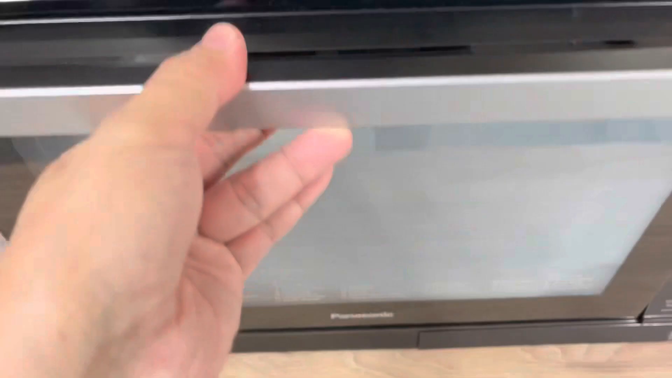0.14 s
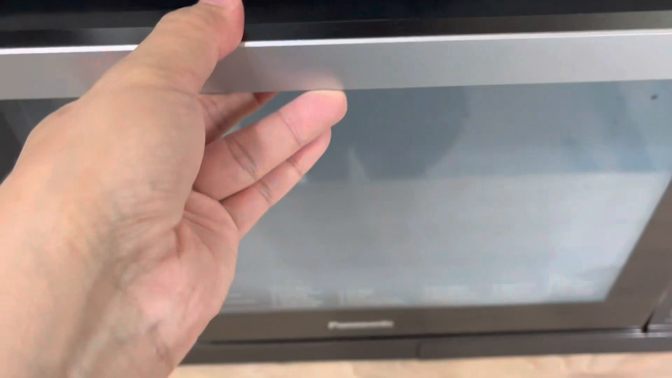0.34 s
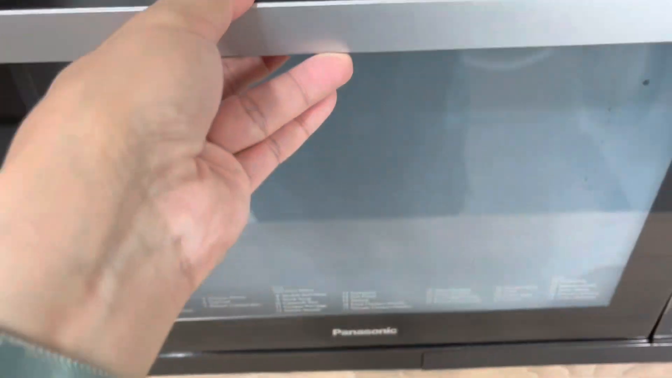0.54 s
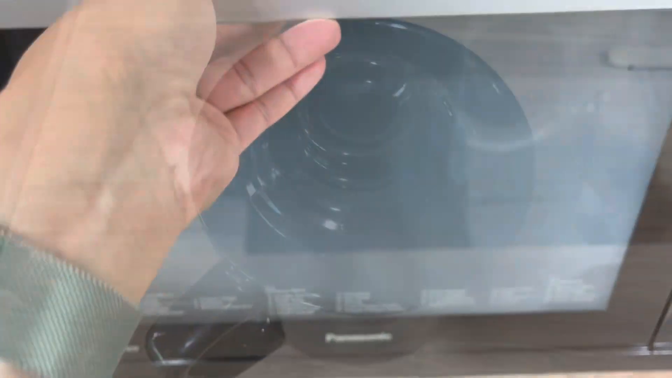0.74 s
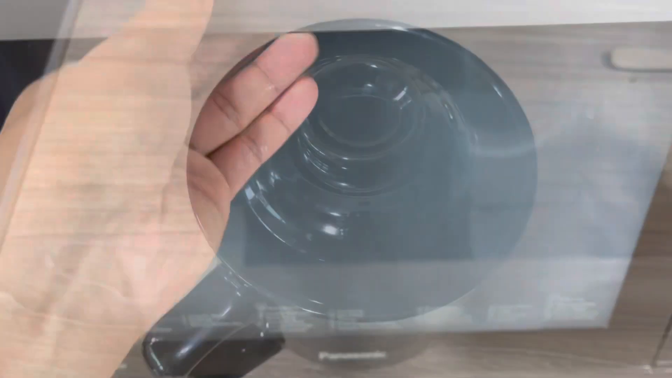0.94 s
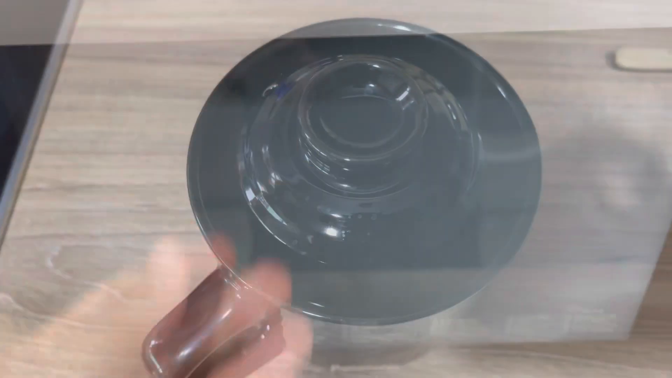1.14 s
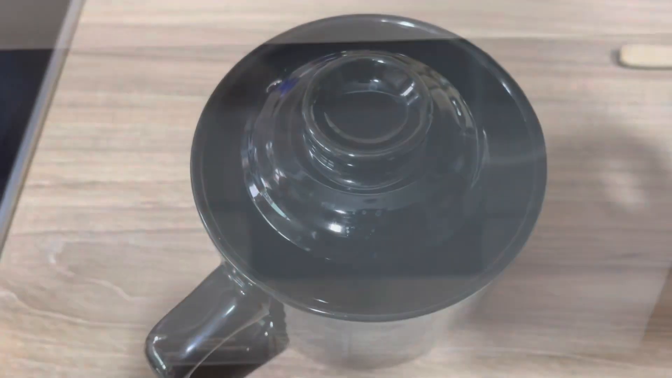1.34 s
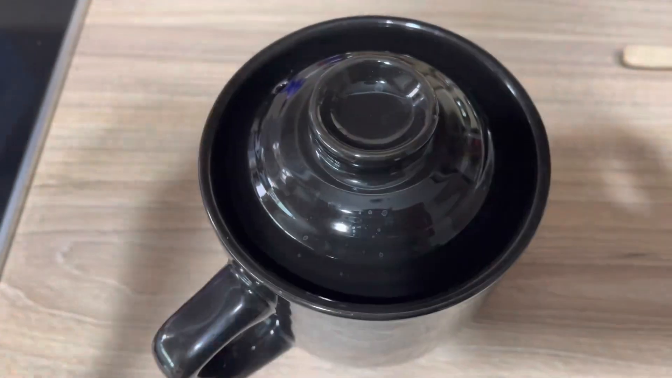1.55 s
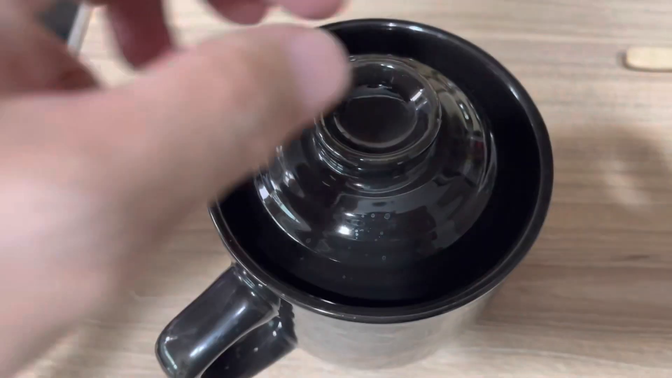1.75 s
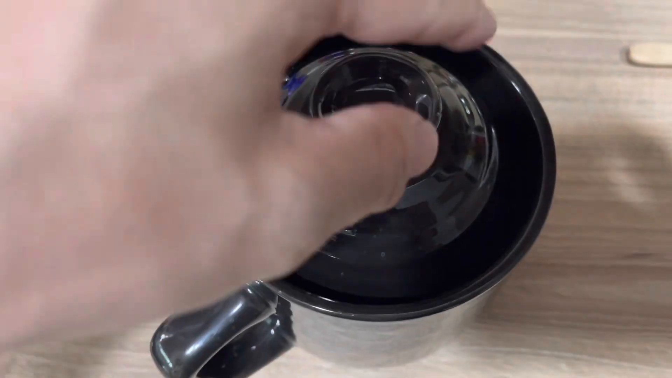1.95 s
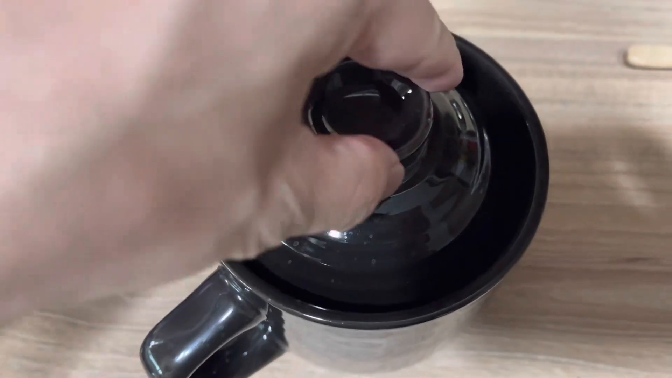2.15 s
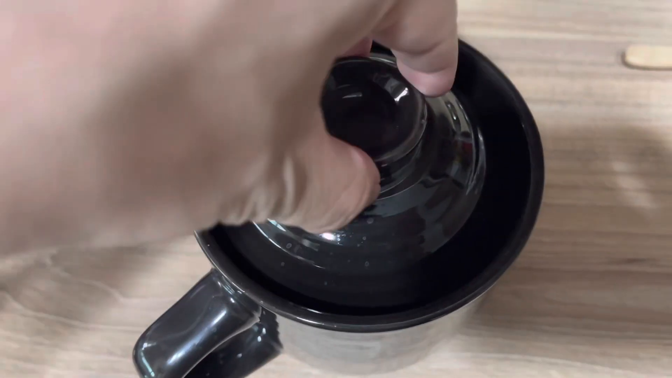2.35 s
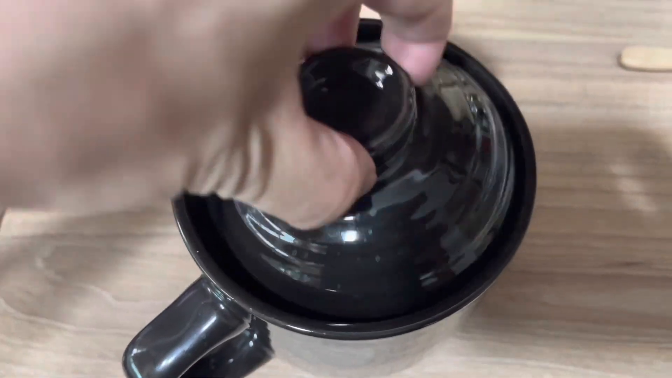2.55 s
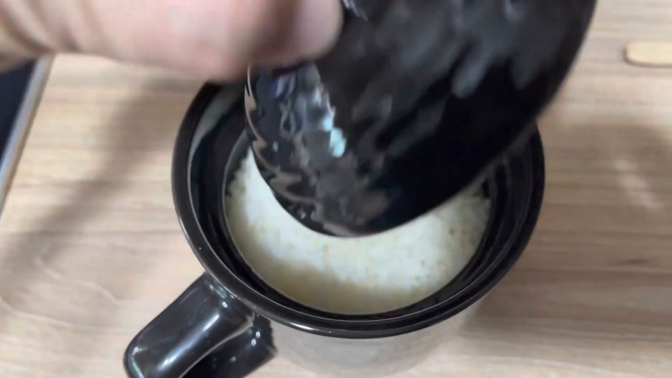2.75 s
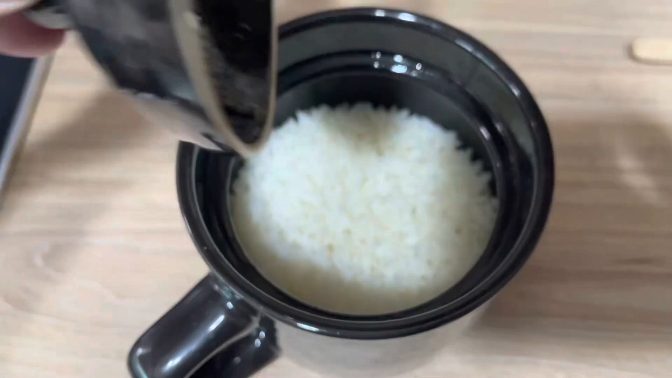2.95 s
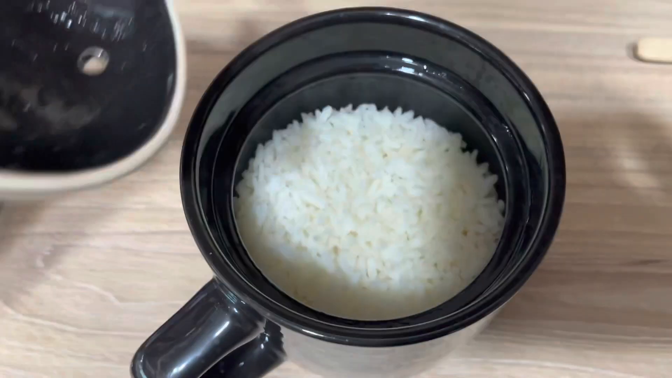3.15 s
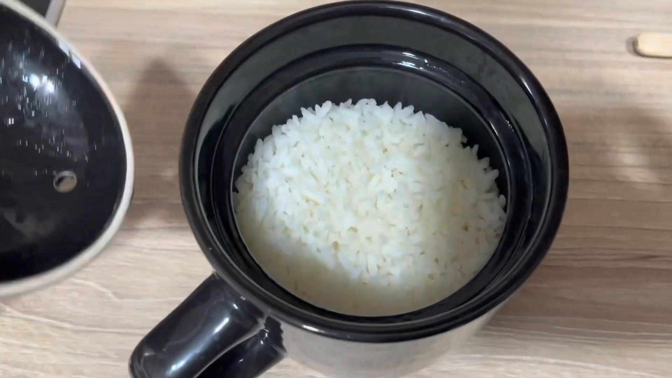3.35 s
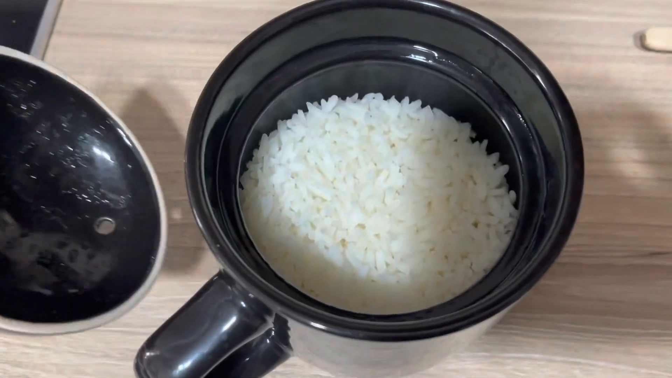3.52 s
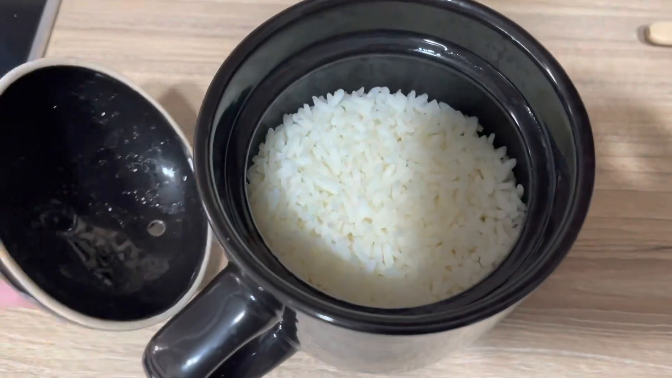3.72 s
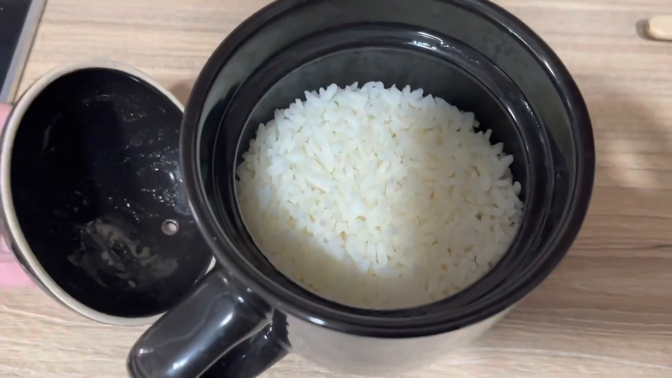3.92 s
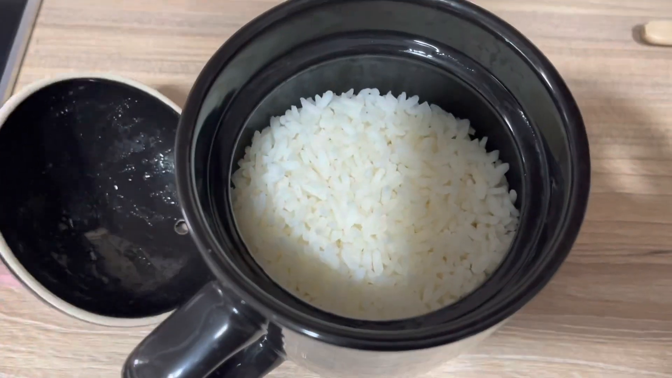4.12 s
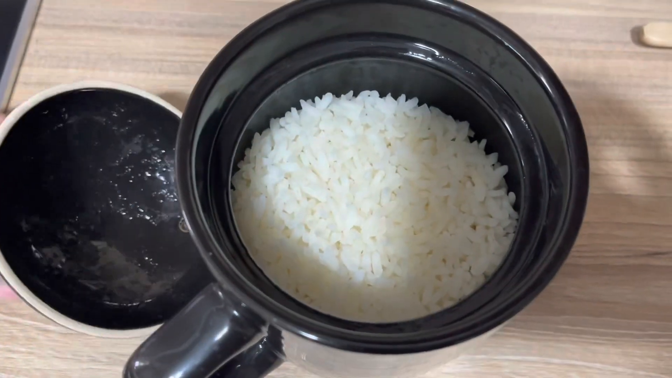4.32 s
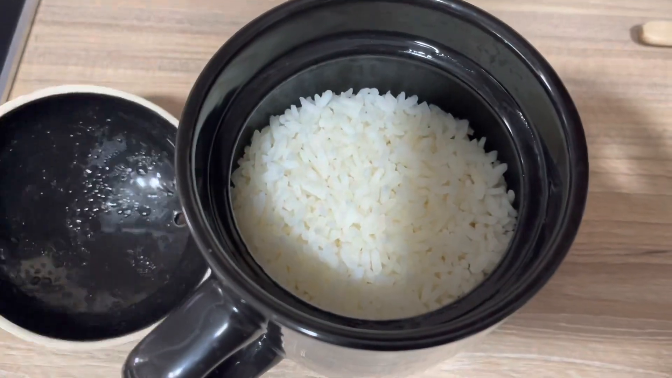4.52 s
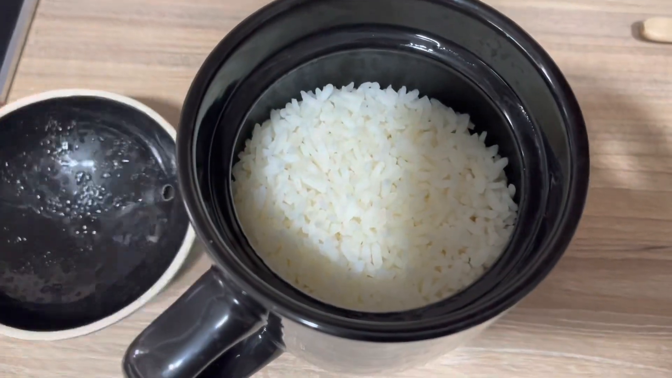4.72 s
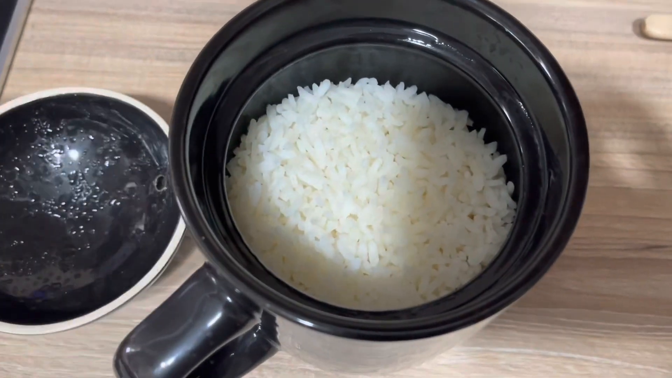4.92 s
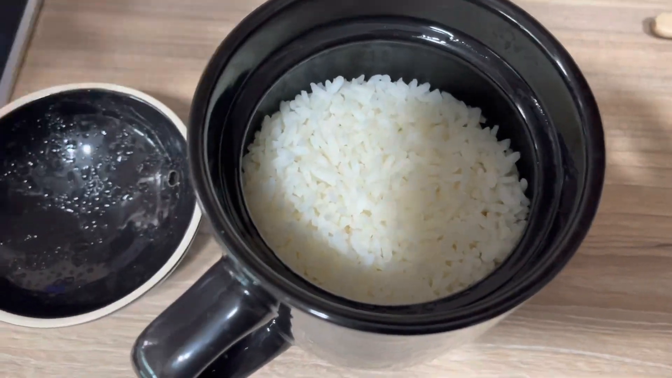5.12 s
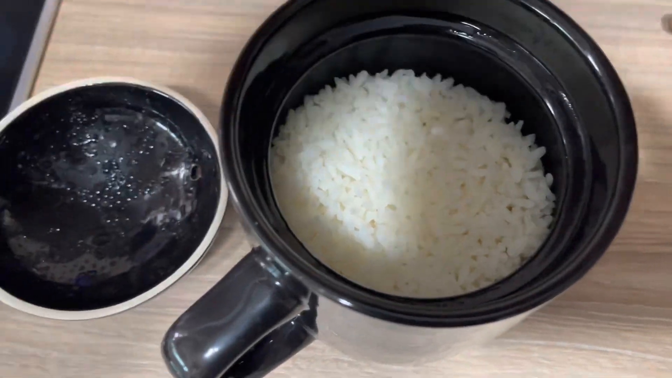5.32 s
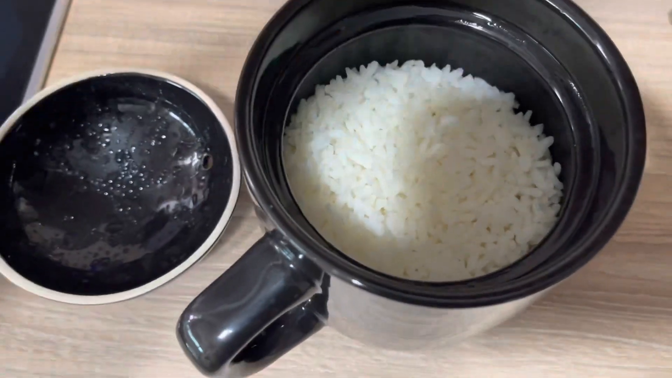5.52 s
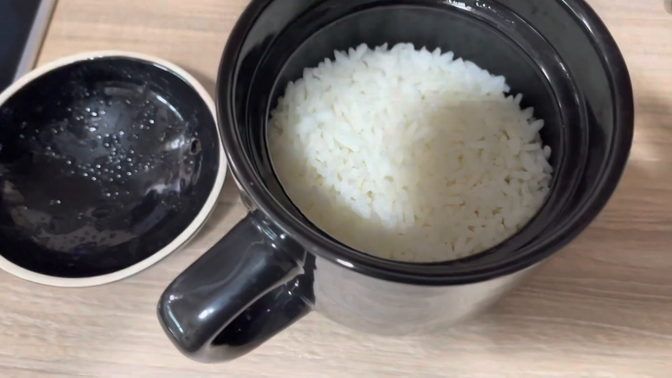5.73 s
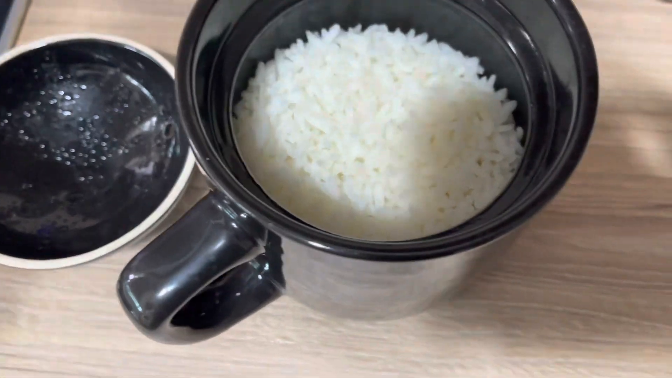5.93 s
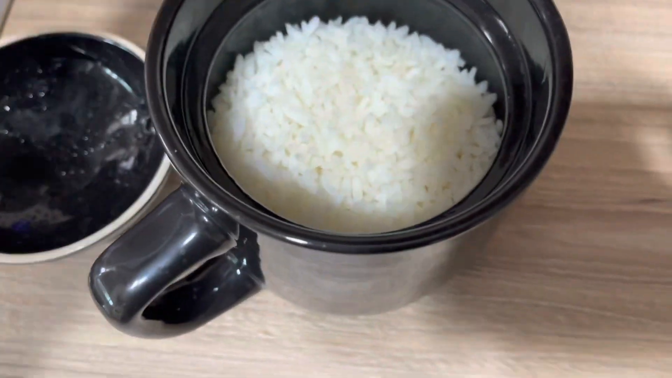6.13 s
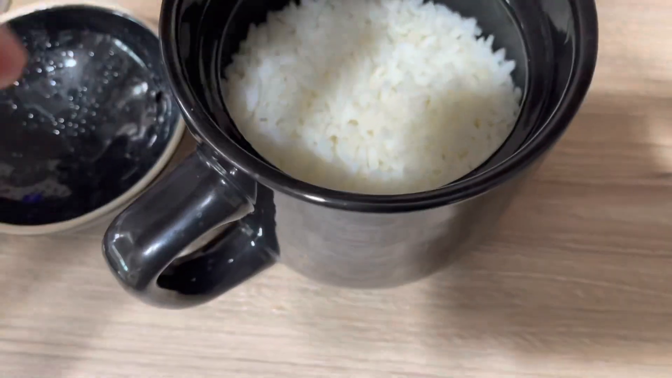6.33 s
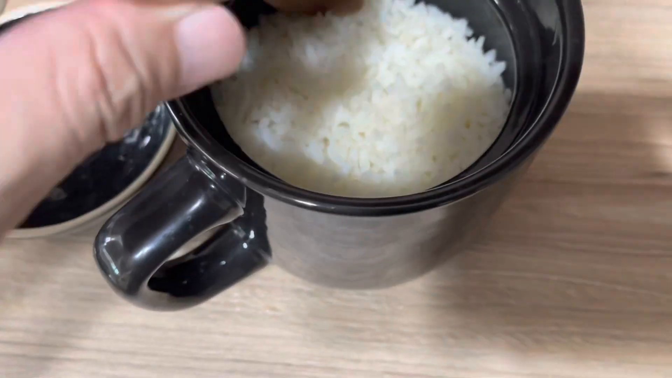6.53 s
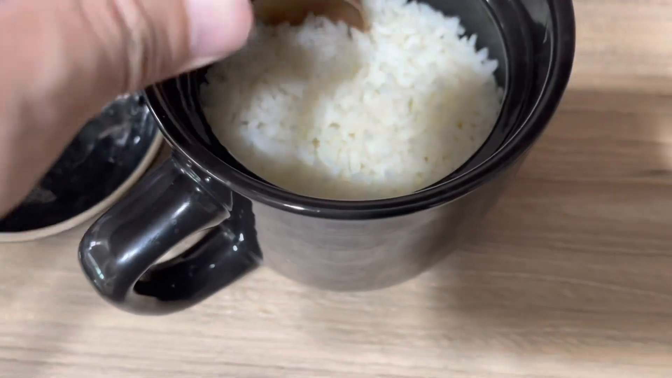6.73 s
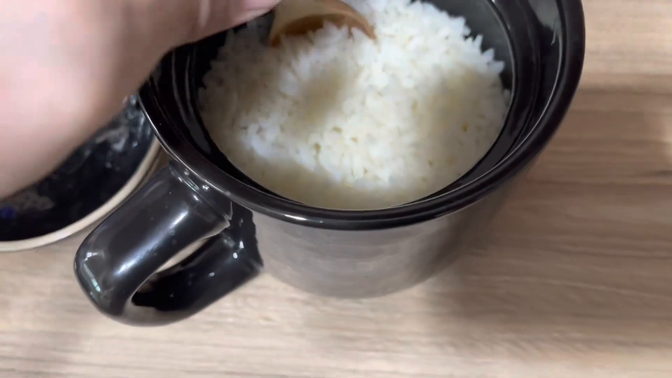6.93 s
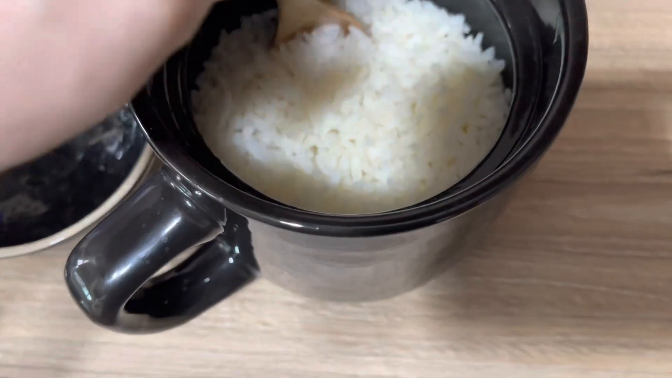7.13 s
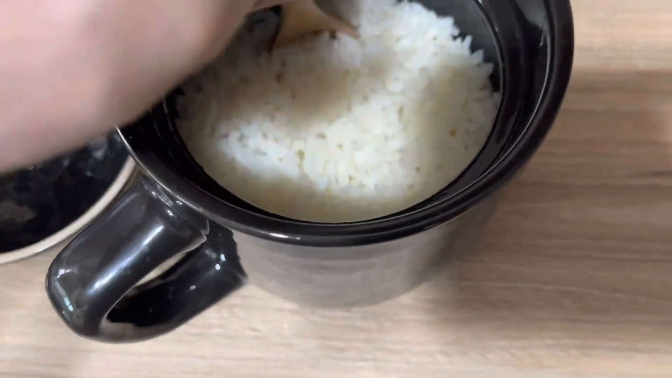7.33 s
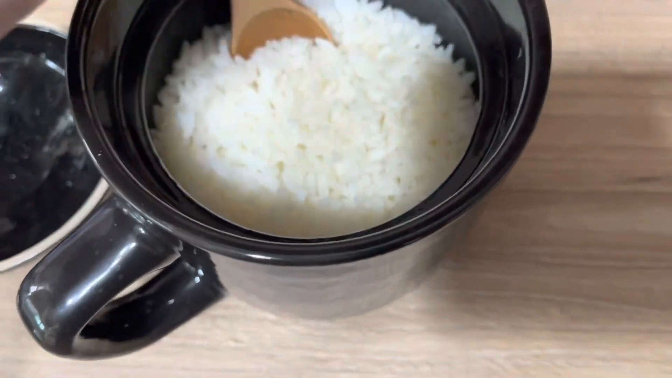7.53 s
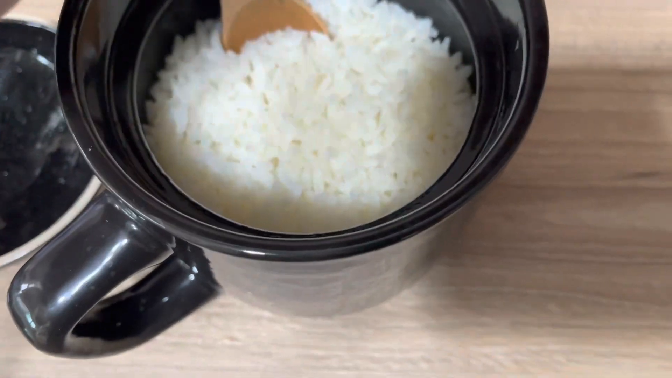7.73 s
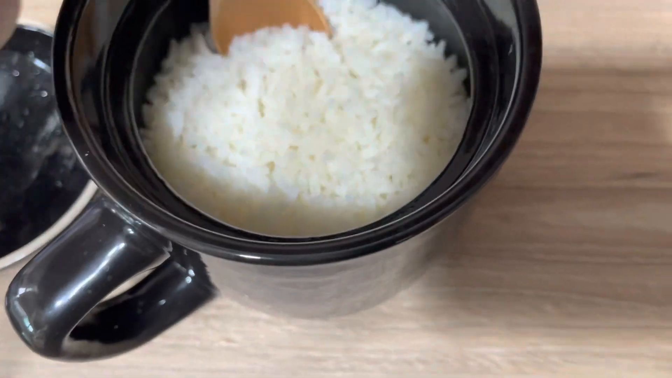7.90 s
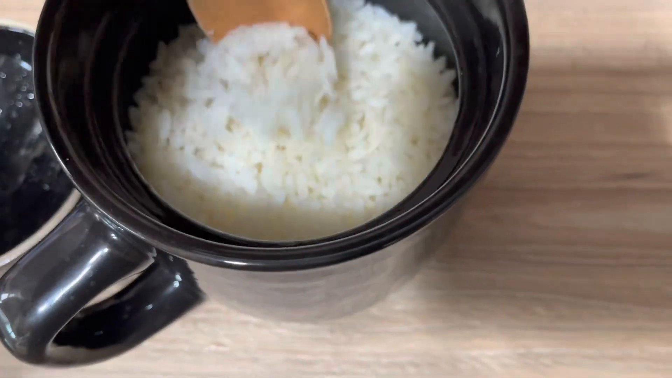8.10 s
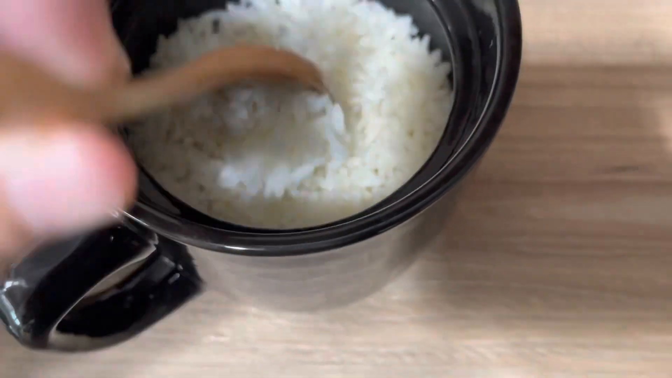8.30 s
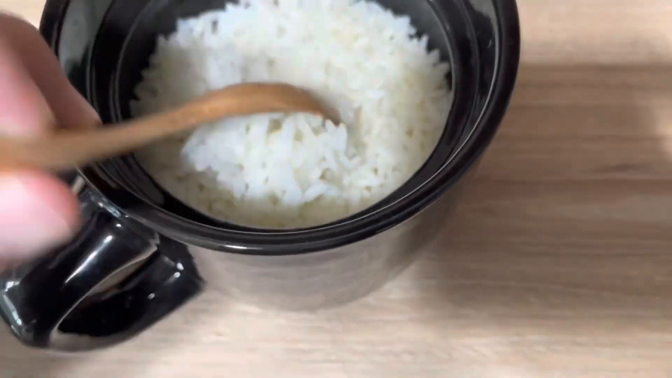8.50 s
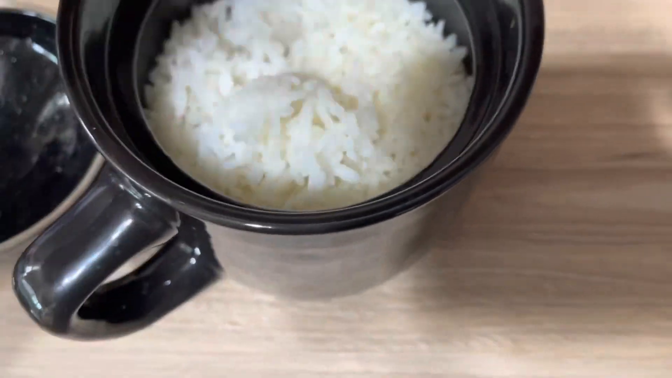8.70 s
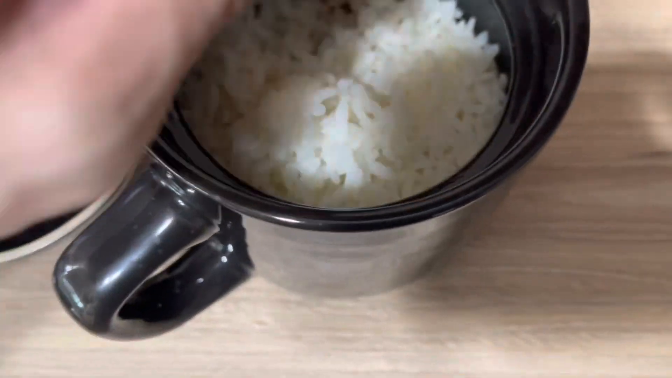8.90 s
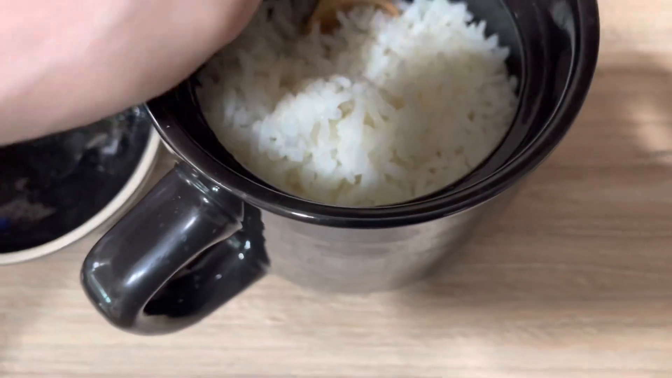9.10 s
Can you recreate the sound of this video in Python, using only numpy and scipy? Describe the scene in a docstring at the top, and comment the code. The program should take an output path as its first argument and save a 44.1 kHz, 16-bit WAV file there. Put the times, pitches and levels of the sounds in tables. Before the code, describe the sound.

Close kitchen handling: appliance door clicks shut, ceramic lid clinks and rattles down on a table, spoon taps a mug and rice crackles softly.

```python
"""An oven door latches shut: clicks excite sheet-metal modes and the oven box booms.
A ceramic lid scrapes and knocks off a mug, then lands on a wooden table and rocks: blows excite decaying modes.
A wooden spoon taps the mug, then digs into sticky rice: short pitched pops over swells of crackle.
Cloth rustles come and go as shaped noise; a low hum and faint hiss run throughout.
A small kitchen answers with a noise-like tail, heard through a close two-port microphone."""
import sys
import numpy as np
from scipy import signal
from scipy.fft import rfft, irfft
from scipy.io import wavfile
from scipy.ndimage import uniform_filter1d

SR = 44100
rng = np.random.default_rng(int(sys.argv[2]) if len(sys.argv) > 2 else 0)


def wav_out(sig):
    """Save sig, one row per channel (or a flat mono array), as 16-bit PCM at SR to the path in sys.argv[1]."""
    wavfile.write(sys.argv[1], SR, np.round(np.clip(np.atleast_2d(sig).T, -1, 1) * 32767).astype(np.int16))


N = 403956  # samples in the scene

# ringing modes of the lid's rim, its dome and the mug: f/Hz, relative level/dB, t60/s
LID_RIM = [(1766, -7, .06), (4064, 1, .11), (4092, -12, .15), (4420, -16, .04), (7050, 2, .07),
           (7075, -12, .16), (8430, -16, .04), (10590, -1, .1)]
LID_DOME = [(9590, 0, .07), (9625, -9, .17), (10820, -5, .09), (10860, -13, .16)]
MUG = [(1510, 0, .14), (1642, -1, .18), (2837, -22, .06), (3960, -20, .05), (4893, -16, .08),
       (6090, -20, .05)]
# modes of the table frame: f/Hz, relative level/dB, t60/s
THUD = [(125, -14, .06), (190, -3, .06), (250, -10, .06), (310, -9, .07), (345, 0, .1), (411, 0, .08),
        (500, -14, .04)]
# contact hardness felt by rim, dome, mug, board, thud: f/Hz
HARDNESS_HZ = [14000, 13910, 7090, 5400, 500]


def crockery():
    """Knocks, taps and strokes push the bodies; each rings with its own modes."""
    modes = LID_RIM, LID_DOME, MUG, BOARD, THUD
    spreads = 1.1, 1.5, 1.5, 2.4, 2.0  # radians; the wide table reaches the ports least alike
    bodies = []
    for body_modes, spread, hardness_hz in zip(modes, spreads, HARDNESS_HZ):
        bodies.append(signal.fftconvolve(ring(body_modes, spread), push(hardness_hz)[None]))
    force, out = np.zeros((5, 2, N)), np.zeros((2, N))  # force: one pair per body
    knock_lid(force, out)
    rock_mug(out)
    tap_spoon(force, out)
    stroke(force, out, bodies)
    force[4] = force[4].mean(0)  # long waves reach both ports alike
    out += sum(signal.oaconvolve(f, b, axes=1)[:, :N] for f, b in zip(force, bodies))
    # small things radiate no deep bass
    return signal.sosfilt(signal.butter(3, 130, "high", fs=SR, output="sos"), out)


# knocks of the lid, by contact: t/s, strength level/dB, then lid ring and crack level/dB over the strength
BLOWS = {"rim on mug": [(2.48, -34, -30, -14), (2.511, -14, 1, -6), (2.51494, -19, -4, 0),
         (2.52207, -26, 5, -10), (2.52995, -26, 4, 6), (2.54114, -27, 2, 6), (2.552, -24, -24, -8),
         (2.573, -30, -14, 2)], "lip grazing mug": [(2.516, -32, -20, -10), (2.544, -24, -20, -10),
         (2.576, -29, -20, -10)], "edge on table": [(4.114, -58, -10, 4), (4.141, -62, -12, 1),
         (4.1785, -7, -11, 6), (4.205, -10, -22, -1), (4.215, -20, -20, -8), (4.225, -16, -22, -7),
         (4.236, -19, -22, -5), (4.247, -21, -20, -8), (4.26, -28, -16, -8), (4.278, -34, -14, -6)],
         "knob on table": [(4.536, -64, -4, 9), (4.573, -66, 3, -5), (4.745, -7.5, -8, -2),
         (4.752, -9, -11, -2), (4.758, -16, -20, -10), (4.766, -14, -18, -11), (4.777, -16, -18, -5),
         (4.785, -15, -20, -14), (4.794, -13, -22, -8), (4.799, -15, -24, -14), (4.809, -15, -24, -15),
         (4.821, -15, -24, -14), (4.835, -17, -24, -16), (4.848, -17, -24, -13), (4.853, -19, -24, -15),
         (4.869, -21, -22, -14), (4.878, -19, -18, -17), (4.882, -21, -22, -16), (4.897, -24, -22, -16),
         (4.9184, -30, -22, -16), (4.9265, -31, -22, -16), (4.9464, -35, -22, -16)]}
# how a knock spreads, by contact: surface, level/dB into rim, dome, mug, thud, struck edge, board, crack,
# the board's favoured f/Hz, left-right level/dB
CONTACTS = {"rim on mug": ("glaze", -2, -28, -22, -10, -12, -30, -1, 1500, 4.5),
            "lip grazing mug": ("glaze", 0, -20, 0, -12, 4, -30, 0, 1500, 4.5),
            "edge on table": ("wood", -1, -6, -25, -6, -5, -1, 1, 1150, 5.5),
            "knob on table": ("wood", -28, -1, -22, -8, -30, -2.5, -3, 1850, 4)}
# struck-edge modes, the mug's lip and the lid's edge: f/Hz, relative level/dB, t60/s
MUG_LIP = [(4893, 0, .06), (4716, -14, .05), (6090, -14, .03)]
LID_EDGE = [(7058, -2, .09), (9595, 1, .06)]


def knock_lid(force, out):
    """Each blow pushes lid, mug and frame, rings an edge and the table top, and splinters at its onset."""
    edges = {"glaze": ring(MUG_LIP, size=6000), "wood": ring(LID_EDGE, size=6000)}
    for name, contact in CONTACTS.items():
        surface, rim_db, dome_db, mug_db, thud_db, edge_db, board_db, splinter_db, board_hz, pan = contact
        for s, db, ring_db, crack_db in BLOWS[name]:
            # the board rings through spot(), so its shared body gets no push here
            parts = db + np.array([rim_db + ring_db, dome_db + ring_db, mug_db, -np.inf, thud_db])
            add(out, s, panned(gain_of(db + board_db) * spot(board_hz), pan))
            add(out, s, panned(gain_of(db + ring_db + edge_db) * edges[surface], pan))
            add(force, s, gain_of(parts)[:, None, None] * panned(np.ones(1), pan))
            splinter = crack(points=SPLINTERS[surface])
            splinter = np.convolve(np.convolve(splinter, push(15000)), push(15000))
            add(out, s, panned(splinter * gain_of(db + crack_db + splinter_db), pan))


# modes of the table top: f/Hz, relative level/dB, t60/s
BOARD = [(800, -20, .04), (930, -13, .04), (1040, -4, .07), (1155, -6, .06), (1345, -8, .05),
         (1419, -6, .06), (1531, -4, .06), (1645, -1, .05), (1724, 1, .05), (1850, 0, .05), (1937, 0, .06),
         (2043, -2, .06), (2276, -2, .05), (2440, -6, .04), (2680, -7, .045), (2900, -12, .035),
         (3180, -12, .04), (3400, -17, .035)]
SPOT_DB, SPOT_SHIFT = 4.0, .015  # largest random change of a mode's level (dB) and pitch (fraction)
FOCUS_DB = 7.0  # loss of the table's modes one octave away from the favoured pitch


def spot(favoured_hz):
    """The table struck at one more place: its modes come out in other strengths, slightly off pitch."""
    shift, lean = rng.uniform(-1, 1, (2, len(BOARD)))
    hz, db, t60 = np.transpose(BOARD)
    db = db + SPOT_DB * lean - FOCUS_DB * np.log2(hz / favoured_hz) ** 2
    modes = np.transpose([hz * (1 + SPOT_SHIFT * shift), db, t60])
    return signal.fftconvolve(ring(modes, 2.4, sense=-1, size=6000), push(HARDNESS_HZ[3])[None])


# two axes of the lid's lowest bending: f/Hz, relative level/dB (not read), free t60/s
LID_OVAL = [(1761.5, 0, .52), (1771.7, 0, .46)]
# knocks that leave the lid free to sing: t/s, level/dB into either axis, radians the second axis leads,
# multiple of the free t60
SINGS = [(2.573, -40, -47, -2.8, 1.15), (4.181, -23.5, -22, -2.05, 1), (4.1821, -20, -40, 0, .22),
         (4.88, -43, -55, 0, 1)]


def oval():
    """The lowest bending of the lid; its two axes beat against each other."""
    out, t = np.zeros((2, N)), np.arange(SR // 2) / SR
    for s, first_db, second_db, lead, share in SINGS:
        for (hz, _, t60), level_db, turn in zip(LID_OVAL, (first_db, second_db), (0, lead)):
            decay = gain_of(level_db - 60 * t / (share * t60))
            add(out, s, panned(decay * np.sin(2 * np.pi * hz * t + turn), 3.0))
    return out


# the full mug rocking on its foot: f/Hz, relative level/dB, t60/s
MUG_FOOT = [(400, 0, .05), (215, -10, .06)]
# nudges that rock the mug: t/s, strength level/dB
NUDGES = [(2.481, -31), (2.5115, -15), (2.548, -33), (2.578, -35), (6.4275, -35)]


def rock_mug(out):
    """Soft nudges excite the low modes of the mug on its foot."""
    foot = signal.fftconvolve(ring(MUG_FOOT, size=6000), push(900)[None])
    for s, db in NUDGES:
        add(out, s, gain_of(db) * foot)


# taps of the spoon: t/s, strength level/dB, then level/dB into mug, thud, crack, spoon, left-right level/dB
SPOON = [(6.4273, -19, -19, -7, -10, -10, 5.5), (6.468, -36, -30, -19, -20, -4, 6),
         (6.478, -32, -4, -19, -22, -20, 6), (7.203, -36, -25, -1.5, -22, -14, 3),
         (7.24, -47, -25, -5, -16, -14, 0), (7.613, -35, -25, -16, -11.5, -25, 1),
         (7.636, -35, -42, 1.5, -34, -30, 2), (8.435, -54, -32, -10, -12, -20, 1),
         (8.7256, -12, -18, -26, -7.5, -25, 3), (8.786, -27, -34, -3, -28, -30, 0),
         (8.821, -35, -23, -20, -8, -30, 2), (9.095, -23, -36, -4.5, -17, -20, 6),
         (9.123, -28.5, -30, -2, -12, -20, 4)]
# modes of the spoon itself: f/Hz, relative level/dB, t60/s
WOOD = [(603, -4, .04), (840, 0, .035), (985, -4, .03), (2380, -12, .02), (4100, -4, .03)]
# spectrum of wood ticking on glaze: f/Hz, relative level/dB per Hz
TICK = [(290, -28), (500, -6), (1750, -4.5), (2250, -15), (6260, -4.5), (8520, -7), (10000, -7),
        (11300, -8), (12400, -13), (16100, -51), (22000, -120)]
DAMPED = .7  # share of the mug's t60 left while the spoon rests on it


def tap_spoon(force, out):
    """Each tap rings the spoon and the damped mug, thuds through the table frame and ticks."""
    wood, held = ring(WOOD), ring(np.array(MUG) * [1, 1, DAMPED])
    for s, db, mug_db, thud_db, crack_db, wood_db, pan in SPOON:
        add(out, s, panned(gain_of(db + wood_db) * wood, pan))
        add(out, s, gain_of(db + mug_db) * panned(held, pan))
        add(force[4], s, gain_of(db + thud_db) * panned(np.ones(1), 0))
        add(out, s, panned(crack(t60=0.014, points=TICK) * gain_of(db + crack_db + 8.5), pan))


# sliding and rocking contact: (start t/s, rise/s, hold/s, fall/s, pressure level/dB),
# (contacts per s, level/dB into rim, dome, mug, board, thud, crack), surface
STROKES = [((2.385, .03, .085, .008, -57), (1800, -6, -35, -24, -7, 4, -8), "glaze"),
           ((2.522, .004, .003, .065, -32), (590, -18, -30, -12, -19.5, -3, -6), "glaze"),
           ((4.187, .004, .01, .08, -26), (1200, -30, -26, -32.5, -4, -7, -10), "wood"),
           ((4.716, .008, .018, .004, -43), (2000, -40, -30, -30, 0, 1, -30), "wood"),
           ((4.752, .004, .09, .07, -35), (700, -48, -16.5, -30.5, 0, -4, -19), "wood"),
           ((6.45, .025, .01, .035, -42), (2030, -42, -32, -16, -20, -18, -3), "glaze"),
           ((7.83, .03, .115, .02, -65.5), (1940, -43.5, -44, 0, -24.5, -20, -4), "wood")]


def stroke(force, out, bodies):
    """Rubbing is a swell of tiny random contacts that push the bodies and splinter."""
    sizes = np.array([np.linalg.norm(b[0]) for b in bodies])
    for row, (per_s, *shares, crack_db), surface in STROKES:
        start = round(row[0] * SR)
        contact = (grains(per_s, spread_db=3.0) * swells([row]))[start:start + SR // 2]
        contact = panned(contact, 4.0)
        add(force, row[0], (gain_of(shares) / sizes)[:, None, None] * contact)
        splinter = np.convolve(crack(points=SPLINTERS[surface]), push(7000))
        crackle = signal.fftconvolve(contact, splinter[None])
        add(out, row[0], gain_of(crack_db) / np.linalg.norm(splinter) * crackle)


# the loudest rice grains tearing apart: t/s, level/dB, f/Hz
POPS = [(6.5899, -51, 9100), (6.794, -36, 3020), (6.797, -36, 8020), (6.8275, -38, 7500),
        (6.832, -34, 2520), (6.8424, -32, 4230), (6.857, -42, 8500), (6.8843, -39, 7970),
        (6.8910, -34, 2580), (6.8955, -35, 3000), (6.913, -40, 2200), (6.925, -44, 8800),
        (6.9541, -36, 5540), (6.9716, -40, 2620), (6.979, -42, 1500), (6.9845, -34, 9070), (7.0, -44, 7500),
        (7.0165, -37, 3470), (7.0339, -29, 8390), (7.043, -38, 3200), (7.0658, -37, 3520),
        (7.105, -46, 5500), (7.113, -44, 4000), (7.1232, -45, 8540), (7.1442, -39, 3540),
        (7.1641, -27, 6650), (7.1906, -46, 6840), (7.4096, -50, 7720), (7.4395, -32, 3520),
        (7.4484, -36, 7890), (7.5183, -48, 8320), (7.5363, -46, 8540), (7.5882, -46, 7660),
        (7.6121, -38, 3520), (7.6854, -47, 8540), (7.7069, -43, 7840), (7.7438, -44, 8710),
        (7.8022, -39, 8510), (7.8436, -36, 8530), (7.9374, -37, 8420), (7.9733, -41, 8290),
        (8.0212, -50, 7560), (8.2636, -45, 8670), (8.4033, -51, 7900), (8.4334, -52, 2710),
        (8.5495, -54, 8960), (8.8603, -45, 5340), (8.9351, -41, 3530), (8.9431, -40, 7640),
        (8.9564, -38, 6280), (8.971, -39, 5100), (8.9804, -40, 7030), (9.0079, -35, 6950),
        (9.0254, -33, 5140), (9.0389, -21, 7850), (9.0578, -24, 5190), (9.0902, -37, 7340)]
# spectrum of the sticky crackle: f/Hz, relative level/dB per Hz
STICKY = [(350, -54), (600, -57), (1170, -4), (1650, -12), (1930, -10.5), (3720, -8), (8380, 3.5),
          (10100, -2.5), (11400, -1), (12400, -3), (16100, -47), (22000, -120)]
# the spoon pushes through the rice: start t/s, rise/s, hold/s, fall/s, effort level/dB
SCOOPS = [(6.6, .15, .1, .05, -72), (6.77, .04, .03, .05, -60), (6.86, .035, .02, .08, -56),
          (6.96, .07, .05, .1, -63), (7.38, .09, .02, .04, -52), (7.6, .1, .1, .05, -79),
          (7.8, .05, .12, .06, -62), (8.26, .04, .26, .03, -76), (8.73, .005, .01, .09, -62),
          (8.79, .04, .02, .1, -65), (8.85, .1, .05, .02, -60), (8.97, .07, .01, .06, -47)]
# small pops fall between these times: t/s
DIGGING_S = (6.62, 8.6)
SMALL_POPS, SMALL_POP_DB, POP_PAN_DB = 60, -61.5, 4  # count, middle level (dB), left-right dB


def rice():
    """Single pops, a tick and a cycle or two of ring, over a dense sticky crackle."""
    out, t = np.zeros(N), np.arange(300) / SR
    when, size, pitch = rng.random((SMALL_POPS, 3)).T
    small_s = np.interp(when, [0, 1], DIGGING_S)
    small_db = SMALL_POP_DB + 12.0 * (size - .5)
    small_hz = 2600 * 3.6 ** pitch ** .3  # most of them high
    for s, db, hz in [*POPS, *np.transpose([small_s, small_db, small_hz])]:
        cycles = hz * t
        tone = 1.6 * (hz / 8000) ** .6 * np.sin(2 * np.pi * cycles) * np.exp(-cycles / 1.2)
        tick = 0.5 * crack(t60=0.016)[:300]
        add(out, s, gain_of(db) * (tone + tick))
    pops = signal.sosfilt(signal.butter(2, 750, "high", fs=SR, output="sos"), out)
    fine = panned(grains(1500, spread_db=4.0), 3.0) + .35 * rng.standard_normal((2, N))
    return panned(pops, POP_PAN_DB) + evened(colour(fine, STICKY)) * swells(SCOOPS)


# latch parts: t/s, strength level/dB, crack level/dB and boom level/dB over it, hardness f/Hz
LATCH = [(.5592, -23, -6, -33, 5000), (.563, -28, -14, -33, 3000), (.568, -24, -26, -32, 1200),
         (.574, -26, -30, -30, 800), (.657, -30, 3, -40, 4000), (.661, -27, -10, -36, 3000),
         (.666, -27, -8, -40, 3000), (.670, -22, -1, -41, 4000), (.673, -22, -6, -41, 3000),
         (.679, -27, -10, -40, 2000), (.685, -23, -12, -36, 1200), (.691, -26, -16, -36, 900),
         (.698, -31.5, -40, 14.5, 900), (.703, -32, -11.5, -30, 1200), (.9, -63, 6, 3, 3000),
         (.918, -58, 3, -10, 3000), (.96, -54, 2, -16, 4000)]
# modes of the door's sheet metal: f/Hz, relative level/dB, t60/s
DOOR = [(452, -3, .04), (580, -7, .04), (800, -5, .03), (950, -3, .03), (1107, 1, .035), (1267, 0, .035),
        (1550, -3, .03), (1717, -4, .025), (1916, -4, .025), (2500, -9, .02), (5200, -10, .012),
        (6500, -8, .015)]
# modes of the oven box: f/Hz, relative level/dB, t60/s
BOOM = [(60, -4, .25), (91.5, 1, .45), (108, 9, .1), (135, 1, .7), (225, -9, .2)]
# spectrum of latch parts snapping: f/Hz, relative level/dB per Hz
SNAP = [(300, -30), (700, -4), (1400, 2), (3000, -4), (4300, -16), (5300, -14), (6500, -5), (9000, -12),
        (12000, -18), (16100, -55), (22000, -120)]


def door():
    """Latch parts click on sheet metal; as the door seats, the box booms."""
    force, shove, out = np.zeros((3, N))
    for s, db, crack_db, boom_db, hardness_hz in LATCH:
        add(force, s, gain_of(db) * push(hardness_hz))
        add(shove, s, gain_of(db + boom_db) * push(260))
        add(out, s, gain_of(db + crack_db) * crack(t60=0.045, points=SNAP))
    sheet = signal.oaconvolve(force[None], ring(DOOR, sense=-1), axes=1)[:, :N]
    high_pass = signal.butter(2, 250, "high", fs=SR, output="sos")
    clatter = signal.sosfilt(high_pass, panned(out + sheet, 2.2))
    boom = signal.oaconvolve(shove[None], ring(BOOM), axes=1)[:, :N]
    return clatter - boom


# sleeve and fingers brushing: start t/s, rise/s, hold/s, fall/s, level/dB
RUSTLES = [(.89, .008, .01, .07, -65), (.95, .008, .005, .03, -66), (1.33, .09, .14, .1, -74),
           (2.73, .09, .1, .1, -73), (3.9, .045, .01, .05, -76), (5.115, .015, .005, .06, -62),
           (5.165, .012, .01, .04, -68), (5.55, .014, .005, .07, -69), (5.63, .02, .005, .04, -69),
           (6.015, .013, .005, .05, -66), (6.11, .04, .09, .04, -66)]
# spectrum of the cloth: f/Hz, relative level/dB per Hz
CLOTH = [(1760, -36), (3000, 3), (3850, 0.5), (4360, -1), (5440, -9.5), (9450, 10.5), (11100, -4.5),
         (12400, 0), (16100, -71), (22000, -120)]


def rustle():
    """Cloth fibres rub: fine hiss, partly shared by the ports."""
    fibres = grains(6000, spread_db=2.5) + .7 * rng.standard_normal((2, N))
    return evened(colour(fibres, CLOTH)) * swells(RUSTLES)


# reverberation of the room: f/Hz, t60/s
ROOM = [(200, 0.51), (1000, 0.33), (3000, .32), (8000, 0.31), (12000, .15)]


def kitchen(x):
    """Sparse taps of random sign, each band dying at its own speed."""
    taps = np.zeros((2, SR // 2))
    at = np.arange(130, SR // 2 - 20, 20)
    at = at + rng.integers(0, 20, (2, len(at)))
    np.put_along_axis(taps, at, rng.choice([-1., 1.], at.shape), 1)
    hz, t, bands = signal.stft(diffuse(*taps), SR, nperseg=256)
    fading = bands * gain_of(-60 * t / read(ROOM, hz)[:, None])
    tail = signal.istft(fading, SR, nperseg=256)[1]
    return signal.oaconvolve(x.mean(0)[None], tail / np.linalg.norm(tail[0]), axes=1)[:, :N]


# spectra of the low wash and of the hiss: f/Hz, relative level/dB per Hz
HUM = [(12, -75.5), (20, -41.5), (35, -20), (55, -12), (80, -1.5), (129, -5.5), (157, -14), (217, -14),
       (251, -17.5), (360, -17.5), (597, -23.5), (642, -30), (702, -29), (1500, -39), (1950, -79),
       (3300, -120)]
HISS = [(530, -31.5), (900, -14.5), (1240, -13), (2210, -8), (2420, -11), (2820, -15), (3630, -21),
        (5630, -27), (8270, -19.5), (9340, -28.5), (12400, -20), (16100, -59.5), (22000, -120)]
# course of the wash before its lumps: t/s, level/dB
HUM_LEVEL = [(0.0, -53), (0.41, -57), (0.84, -50), (1.04, -56), (2.58, -52), (3.62, -55), (3.77, -52),
             (8.7, -55), (9.16, -52)]
HISS_DB = -77


def hum():
    """Low wash of appliances and street, slightly lumpy, under a faint steady hiss."""
    lumps = evened(uniform_filter1d(uniform_filter1d(rng.standard_normal(N), 3000), 3000))
    wash = evened(colour(diffuse(*rng.standard_normal((2, N))), HUM))
    level_db = np.interp(np.arange(N) / SR, *np.transpose(HUM_LEVEL)) + .8 * lumps
    hiss = evened(colour(diffuse(*rng.standard_normal((2, N))), HISS))
    return wash * gain_of(level_db) + gain_of(HISS_DB) * hiss


def gain_of(db):
    """dB to amplitude."""
    return 10 ** (np.asarray(db) / 20)


def evened(x):
    """Scales to rms 1."""
    return x / np.sqrt(np.mean(x ** 2) + 1e-20)


def read(points, hz):
    """Reads a table on a log-frequency axis."""
    f, value = np.transpose(points)
    return np.interp(np.log(hz + 1), np.log(f + 1), value)


def add(mix, s, sound):
    """Adds a sound at a time."""
    part = mix[..., round(s * SR):][..., :sound.shape[-1]]
    part += sound[..., :part.shape[-1]]


def colour(x, points):
    """Shapes a sound by a spectrum."""
    size = x.shape[-1]
    return irfft(rfft(x) * gain_of(read(points, np.fft.rfftfreq(size, 1 / SR))), size)


def panned(x, db):
    """Two channels differing by db; positive leans left."""
    return x * gain_of(np.array([[.5], [-.5]]) * db)


def push(hardness_hz):
    """Contact force of unit area: the harder the contact, the shorter."""
    t = np.arange(600) / SR
    force = t * np.exp(-2 * np.pi * np.clip(hardness_hz, 40, 20000) * t)
    return force / force.sum()


def ring(modes, spread=1.5, sense=1, size=SR // 2):
    """A body's answer to a sharp tap: decaying sines, each at its own phase between the ports."""
    t, out = np.arange(size) / SR, np.zeros((2, size))
    turns = spread * rng.uniform(-1, 1, len(modes))
    for k, ((hz, db, t60), turn) in enumerate(zip(modes, turns)):
        lead = min(hz / 1200, 1) * turn * np.array([[.5], [-.5]])
        sign = sense ** k  # neighbours in step, or opposed at sense -1
        out += sign * gain_of(db - 60 * t / t60) * np.sin(2 * np.pi * hz * t + lead)
    return out / abs(out).max()


# splintery onset of a blow, in general and on glaze: f/Hz, relative level/dB per Hz
CRACK = [(180, -34.5), (300, -11), (650, -18), (1660, 3), (2310, -7), (3300, -5), (6260, -13), (8160, -9.5),
         (10100, -22), (11300, -16.5), (12400, -29), (16100, -55), (22000, -120)]
GLAZE = [(300, -30), (800, -14), (1700, -6), (3000, -6), (5000, -4), (7000, -3), (9000, -6), (11300, -10),
         (12400, -20), (16100, -50), (22000, -120)]
SPLINTERS = {"glaze": GLAZE, "wood": CRACK}


def crack(t60=0.021, points=CRACK):
    """A short splinter of noise."""
    t = np.arange(1024) / SR
    rise = 1 - np.exp(-t / .0004)
    noise = evened(colour(rng.standard_normal(size=1024), points))
    return noise * gain_of(-7 - 60 * t / t60) * rise


def grains(per_s, spread_db):
    """Sparse clicks of random sign, a few of them large."""
    size = gain_of(spread_db * np.minimum(rng.exponential(1, N), 4))
    return evened(size * (rng.random(N) < per_s / SR) * rng.choice([-1., 1.], N))


EDGE_DB = -22  # where a swell begins and ends, relative to its top


def swells(rows):
    """Amplitude over the whole scene: each row rises, holds and falls."""
    t, level = np.arange(N) / SR, np.zeros(N)
    for start, rise, hold, fall, db in rows:
        corners = start + np.cumsum(np.abs([0, rise, hold, fall]))
        level += gain_of(db + np.interp(t, corners, [EDGE_DB, 0, 0, EDGE_DB], -200, -200))
    return uniform_filter1d(level, size=200)


# diffuse sound: f/Hz, left-right likeness (0 to 1)
SAME = [(60, 1), (170, 0.92), (500, 0.19), (1440, 0.063), (4150, 0.78), (12000, 0.12)]


def diffuse(a, b):
    """Two unrelated sounds mixed to a pair whose likeness varies with pitch, closest in the bass."""
    same = np.clip(read(SAME, np.fft.rfftfreq(len(a), 1 / SR)), -1, 1)
    return np.array([a, irfft(same * rfft(a) + np.sqrt(1 - same ** 2) * rfft(b), len(a))])


def scene():
    """All sources, their room, and the hum."""
    near, oven = crockery() + rice(), door()
    room = kitchen(gain_of(-12.5) * near + gain_of(-8) * oven)
    return near + oven + room + oval() + rustle() + hum()


# phase of the left port ahead of the right: f/Hz, radians
PORT_PHASE = [(100, 0), (8700, .1), (9900, -3.1), (10800, -3.5), (12100, -6.3)]
# the treble leans to the right port: f/Hz, left-right level/dB
PORT_TILT = [(4000, 0), (8000, -3), (12000, -8)]
EDGE_HZ = 14500  # band limit


def record(dry):
    """The ports differ in phase and treble; bass and top roll off, peaks round off, then the band limit."""
    hz = np.fft.rfftfreq(N, 1 / SR)
    halves = np.array([[.5], [-.5]])
    turn = np.exp(1j * halves * read(PORT_PHASE, hz)) * gain_of(halves * read(PORT_TILT, hz))
    top = gain_of(read([(11500, 2.5), (13000, -15.5), (15000, -12)], hz))
    roll = top / np.sqrt(1 + (30 / (hz + 1)) ** 4)  # low cut near 30 Hz
    ports = panned(irfft(rfft(dry) * turn * roll, N), .9)
    ports = .92 * np.tanh(ports / .92)  # the input stage rounds off the loudest blow
    band = signal.firwin(255, EDGE_HZ, window=("kaiser", 9), fs=SR)
    return signal.oaconvolve(ports, band[None], "same")


dry = scene()
out = record(dry)
wav_out(out)
```